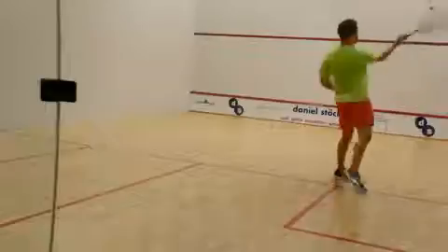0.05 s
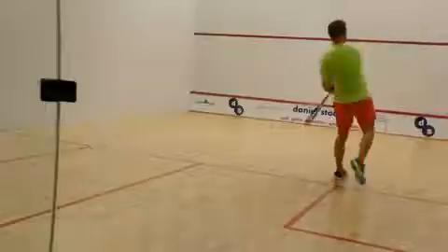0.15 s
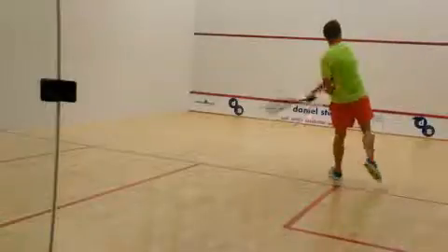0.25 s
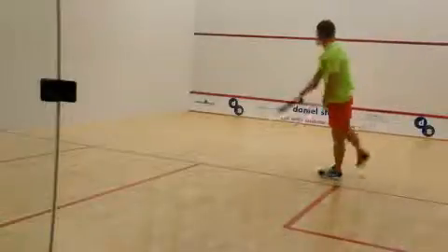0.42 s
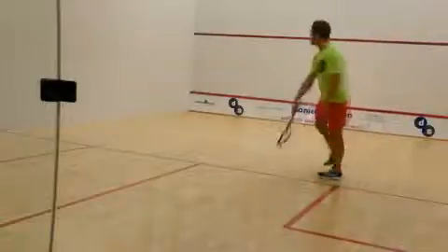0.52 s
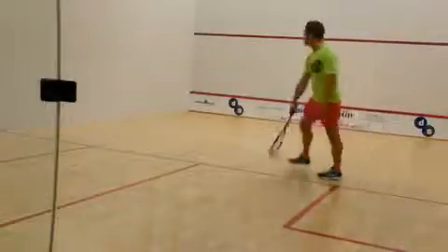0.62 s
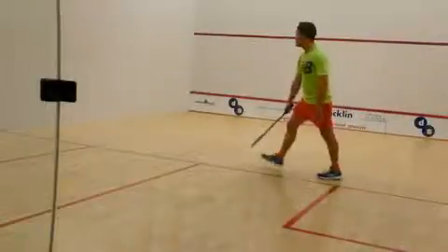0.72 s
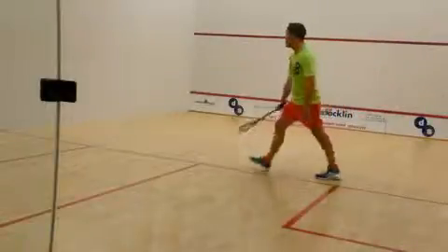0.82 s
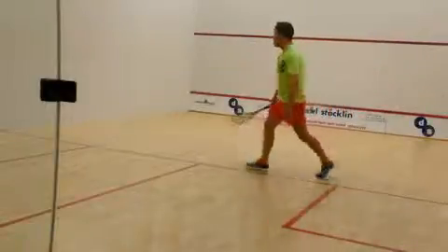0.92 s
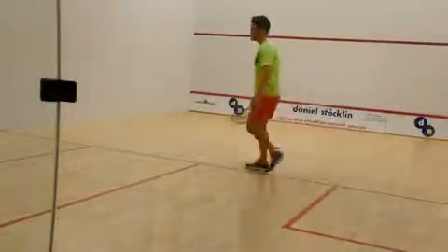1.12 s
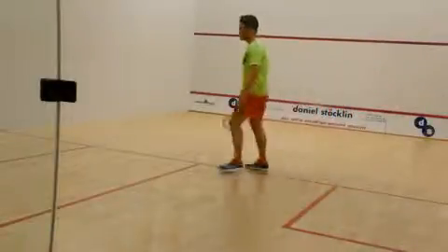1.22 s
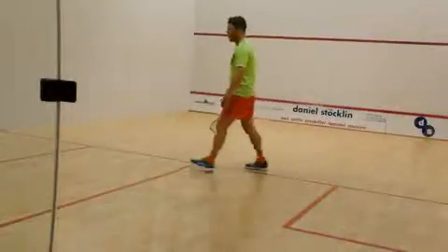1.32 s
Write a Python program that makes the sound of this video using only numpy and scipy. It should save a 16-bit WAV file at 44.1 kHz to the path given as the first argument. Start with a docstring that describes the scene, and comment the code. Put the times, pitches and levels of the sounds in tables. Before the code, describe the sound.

A squash racket hits the ball, which smacks the front wall louder and echoes around the indoor court. Soft footsteps thud and scuff on the wooden floor, with a light ball tap, over faint ventilation.

```python
"""A squash drive, heard from behind the glass back wall: the racket hits the ball, the ball smacks the front
wall, and the hard court swells with echoes and rings on. The stroke and the strongest wall returns carry the
ball's hollow pop. Clothing rustles, feet boom and scuff on the sprung wooden floor, and a lighter tap of the
ball follows, all over the murmur of the hall's ventilation. Hits are shaped noise with the court's decay; the
pop, the court's resonances and the floor's boom are damped sines."""
import sys
import numpy as np
from scipy import signal
from scipy.fft import rfft, irfft, next_fast_len
from scipy.io import wavfile
from scipy.ndimage import map_coordinates

SR = 44100
rng = np.random.default_rng(int(sys.argv[2]) if len(sys.argv) > 2 else 0)


def to_wav(s):
    """Save 16-bit WAV."""
    ch = np.atleast_2d(s).T  # columns
    pcm = np.round(np.clip(ch, -1, 1) * 32767)  # PCM
    wavfile.write(sys.argv[1], SR, pcm.astype(np.int16))


N = 59535
RACKET_S, WALL_S, TAP_S = 0.16, 0.28, 1.266

# reverb time of the court (frequency [Hz], t60 [s])
COURT_T60 = [(100, 2.6), (250, 1.4), (450, 1.87), (850, 1.84), (2200, 1.756), (3800, 1.69), (5500, 1.33),
             (8000, 1), (11000, 0.72), (15000, 0.44)]


def amp(db):
    """Decibels to gain."""
    return 10 ** (np.asarray(db) / 20)


def along(points, hz):
    """Read (frequency, value) points on a log frequency axis."""
    freqs, values = np.transpose(points)
    return np.interp(np.log(hz + 1), np.log(freqs + 1), values)


def filtered(x, response):
    """Filter x by a gain given as a function of frequency."""
    size = next_fast_len(N + 8192)
    return irfft(rfft(x, size) * response(np.fft.rfftfreq(size, 1 / SR)), size)[..., :N]


def since(start):
    """Seconds since start, zero before."""
    return np.maximum(np.arange(N) / SR - start, 0)


def rise(t, attack_s):
    """Exponential attack from 0 towards 1."""
    return 1 - np.exp(-t / attack_s)


def damped_sine(t, hz, db, t60, phase=0):
    """One mode, falling 60 dB in t60 seconds."""
    return amp(db - 60 * t / t60) * np.sin(2 * np.pi * hz * t + phase)


def flutter(rate):
    """A smooth random curve, rate knots a second."""
    return map_coordinates(rng.standard_normal(4096), [np.arange(N) * rate / SR], mode="mirror")


def diffuse(spectrum):
    """Noise from all sides at two close microphones, rms 1: centred lows, wide highs."""
    # likeness of left and right (frequency [Hz], correlation [0-1])
    likeness = [(200, 1), (380, .978), (700, .9), (1400, .73), (2800, .4), (5500, .2), (12000, .05)]

    def mid_side_gains(hz):
        width = np.arccos(along(likeness, hz)) / 2
        return amp(along(spectrum, hz)) * np.array([np.cos(width), np.sin(width)])

    mid, side = filtered(rng.standard_normal((2, N)), mid_side_gains)
    pair = np.array([mid + side, mid - side])
    return pair / np.sqrt(np.mean(pair ** 2))


def court_hit(start, spectrum, early, attack_s, t60_scale):
    """A hit in the court: the early share of power comes at once, echoes build, treble dies first."""
    # how fast echoes fill the court (frequency [Hz], time constant [s])
    fill_times = [(250, 0.064), (850, 0.074), (2200, 0.092), (5000, 0.077), (12000, 0.017)]
    hz, t, bands = signal.stft(diffuse(spectrum), SR, nperseg=512)
    age = np.maximum(t - start, 0)
    density = rise(age, along(fill_times, hz)[:, None]) ** 2.17  # grows faster than linearly at first
    swell = np.sqrt(early + (1 - early) * density)
    decay = amp(-60 * age / (t60_scale * along(COURT_T60, hz)[:, None]))
    tail = signal.istft(bands * swell * decay, SR, nperseg=512)[1][:, :N]
    clumps = amp(0.5 * flutter(rate=450))  # the dense echoes are slightly uneven
    return tail * rise(since(start), attack_s) * clumps


def ventilation():
    """The hall's ventilation lays a steady, low murmur under the play."""
    # colour of the murmur (frequency [Hz], relative density [dB])
    murmur = [(25, -33), (50, -7), (105, -18), (130, 6.5), (165, -4), (200, 4), (300, -2.5), (520, -9),
              (900, -7.5), (1250, -7.5), (2000, -16.5), (5000, -29.5), (9000, -38.5), (15500, -38)]
    return amp(-48.5) * diffuse(murmur)


def racket():
    """The strings meet the ball; the stroke's low body arrives a little later from the walls."""
    # colour of the string hit (frequency [Hz], relative density [dB])
    strings = [(90, -48), (130, -29), (190, -22), (280, -2), (540, -7), (650, -2.5), (870, 0.5),
               (1400, -6.5), (2200, -9.5), (4000, -17.5), (7500, -26.5), (13000, -32), (15500, -35)]
    # colour of the low body (frequency [Hz], relative density [dB])
    body = [(100, -42), (190, -17.5), (285, -1), (370, -2.5), (535, -2), (700, -19), (1400, -35),
            (6000, -70)]
    hit = amp(-24) * court_hit(RACKET_S, strings, early=0.036, attack_s=0.0048, t60_scale=1)
    thump = amp(-31) * court_hit(RACKET_S + 0.044, body, early=0.94, attack_s=0.0087, t60_scale=0.55)
    return hit + thump


def ball_pops():
    """The racket stroke and each strong wall return carry the ball's short hollow ring, slightly detuned at
    random."""
    # modes of the hollow ball (frequency [Hz], relative level [dB], t60 [s])
    modes = [(852, 2.5, 0.035), (1107, 0, 0.021), (2170, -23, 0.0077)]
    # the pop at the racket stroke, then strong returns from the walls (time [s], level [dB])
    pops = [(.181, -25), (.288, -6), (.326, -11), (.389, -7.5), (.396, -9.5), (.487, -17), (.511, -14),
            (.587, -15)]
    out = np.zeros(N)
    for start, pop_db in pops:
        t = since(start)
        detunes = 1 + 0.018 * rng.standard_normal(len(modes))
        ring = sum(damped_sine(t, hz * detune, db, t60) for (hz, db, t60), detune in zip(modes, detunes))
        out += amp(pop_db) * ring * rise(t, attack_s=0.0048)
    return out


def front_wall():
    """The ball smacks the front wall and fills the court: the loudest hit."""
    # colour of the smack (frequency [Hz], relative density [dB])
    smack = [(100, -63), (130, -22), (205, -25.5), (250, -4.5), (400, -11), (640, -6), (760, -2),
             (870, 0.5), (1100, -5), (1420, -18), (1900, -7.5), (2350, -7), (3000, -15), (4200, -18),
             (7000, -23), (12500, -29), (15500, -36)]
    return amp(-13.5) * court_hit(WALL_S, smack, early=0.073, attack_s=0.0014, t60_scale=0.99)


def court_resonances():
    """Narrow resonances swell after the smack, drift in phase and die with the reverb."""
    # narrow rings of the court (frequency [Hz], level [dB])
    modes = [(251, -40), (298, -35), (340, -38.5), (748, -33), (875, -25.5), (925, -38.5), (1016, -33),
             (1093, -34)]
    t = since(WALL_S)
    ring = sum(damped_sine(t, hz, db, along(COURT_T60, hz), phase=0.45 * flutter(rate=14.05))
               for hz, db in modes)
    return ring * rise(t, attack_s=0.037)


def clothing():
    """A faint, bright rustle of cloth fades in as the player walks off."""
    # colour of the rustle (frequency [Hz], relative density [dB])
    cloth = [(1000, -15), (5000, 5), (12000, -4.5), (15500, -4)]
    return amp(-65) * diffuse(cloth) * rise(since(0.56), attack_s=0.15)


def heavy_steps():
    """Each heavy footfall thuds on the boards and sets the sprung floor booming."""
    # heavy footfalls (time [s], level [dB])
    footfalls = [(0.73, -35.5), (1.32, -39.5)]
    # modes of the sprung floor (frequency [Hz], relative level [dB], t60 [s])
    floor_modes = [(129.6, 2, 0.64), (194, -13, .4)]
    # colour of the thud (frequency [Hz], relative density [dB])
    boards = [(70, -25), (108, -20), (126, 0.5), (150, -7), (175, -10), (200, -9), (270, -22), (400, -25),
              (1000, -32), (6000, -75)]
    out = np.zeros((2, N))
    for start, step_db in footfalls:
        t = since(start)
        boom = sum(damped_sine(t, hz, db, t60) for hz, db, t60 in floor_modes) * rise(t, attack_s=0.018)
        thud = court_hit(start, boards, early=0.43, attack_s=0.004, t60_scale=0.54)
        out += amp(step_db) * (boom + thud)
    return out


def light_steps():
    """The floor gives a dull knock under each lighter footfall."""
    # light contacts with the floor (time [s], level [dB])
    contacts = [(.762, -43), (.99, -43)]
    # colour of the knock (frequency [Hz], relative density [dB])
    knock = [(130, -14.5), (210, -5.5), (290, 3), (380, -13), (700, -17), (5000, -70)]
    return sum(amp(db) * court_hit(start, knock, early=0.48, attack_s=0.0043, t60_scale=0.71)
               for start, db in contacts)


def scuffs():
    """Soles brush the boards in bright swishes."""
    # brushes of a sole (time [s], level [dB])
    brushes = [(.868, -56), (1.018, -60), (1.318, -45.5)]
    # colour of sole on wood (frequency [Hz], relative density [dB])
    sole = [(300, -16), (1000, -5), (2500, 0.5), (3300, 3), (4500, -9), (8000, -10), (13000, -16),
            (15500, -20)]
    return sum(amp(db) * court_hit(start, sole, early=0.89, attack_s=0.0069, t60_scale=0.87)
               for start, db in brushes)


def ball_tap():
    """A lighter, nearer tap of the ball: a bright tick over a low knock."""
    # colour of the tap (frequency [Hz], relative density [dB])
    tap = [(100, -19), (180, -9), (260, 5.5), (400, -5.5), (800, -8.5), (1500, -12), (2600, -14.5),
           (4500, -25), (8000, -25), (12500, -18), (15500, -33)]
    return amp(-37) * court_hit(TAP_S, tap, early=0.75, attack_s=0.0013, t60_scale=0.64)


def scene():
    """Play and hall air at a close microphone pair: left a touch earlier, right a touch louder."""
    # stereo balance (frequency [Hz], left minus right [dB])
    balance = [(200, 0), (600, -.5), (1200, -.9), (3000, -1), (12000, .1)]
    left_lead_s = 0.00004
    side = np.array([[1], [-1]])

    def placement(hz):
        return amp(side * along(balance, hz) / 2) * np.exp(1j * np.pi * hz * left_lead_s * side)

    ball = racket() + front_wall() + ball_pops() + court_resonances() + ball_tap()
    player = heavy_steps() + light_steps() + scuffs() + clothing()
    return filtered(ball + player + ventilation(), placement)


def record(dry):
    """A brick-wall low-pass takes off the very top."""
    return filtered(dry, lambda hz: hz < 15600)


dry = scene()
out = record(dry)
to_wav(out)
```